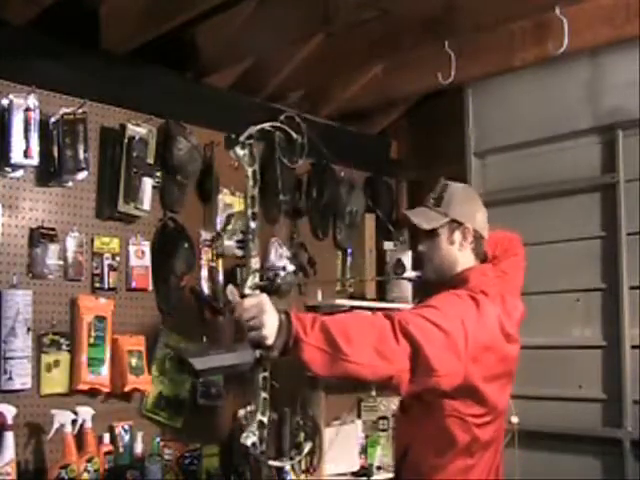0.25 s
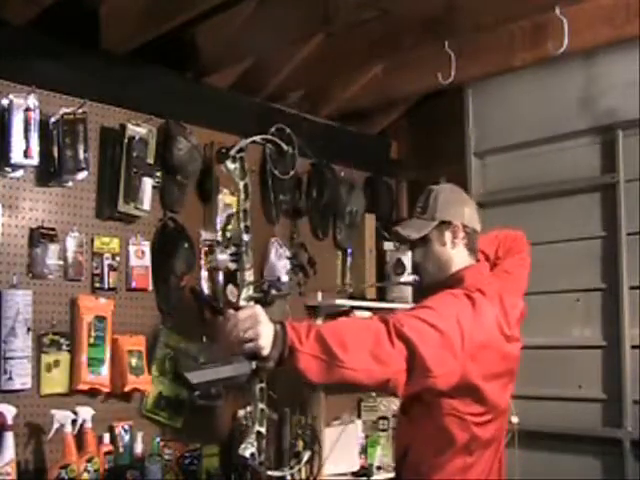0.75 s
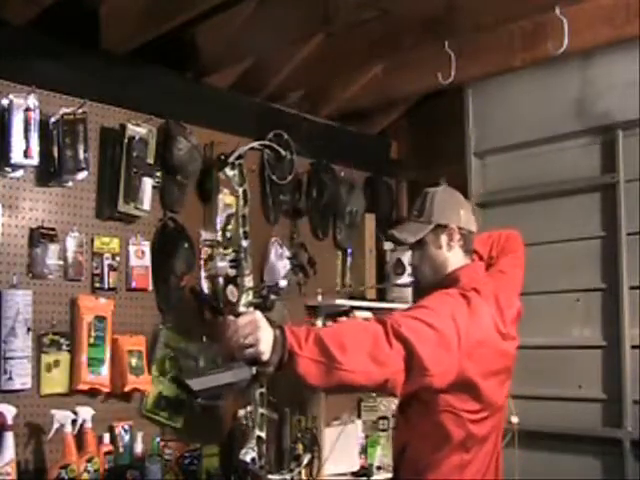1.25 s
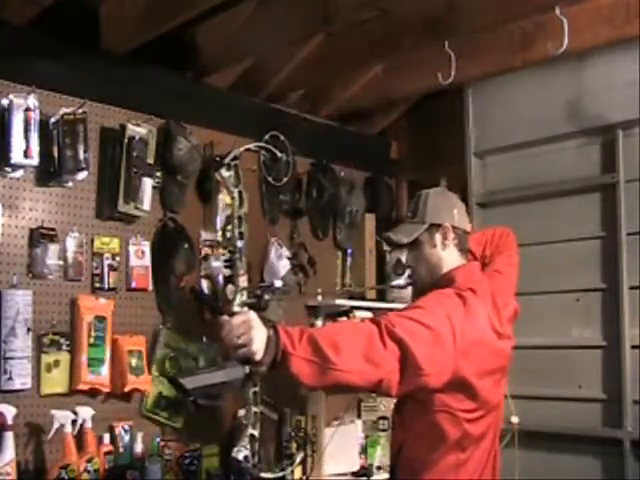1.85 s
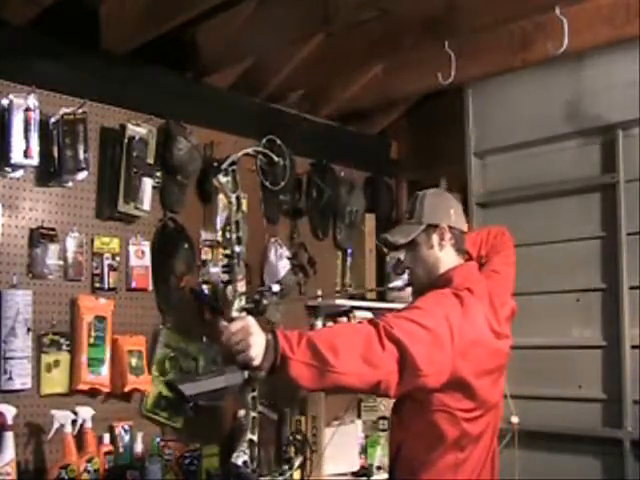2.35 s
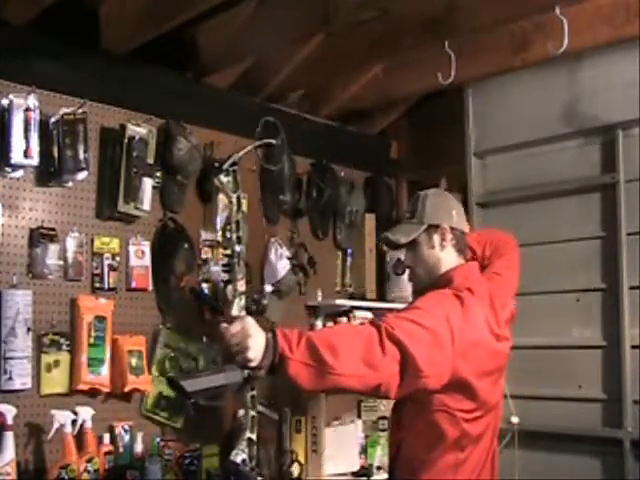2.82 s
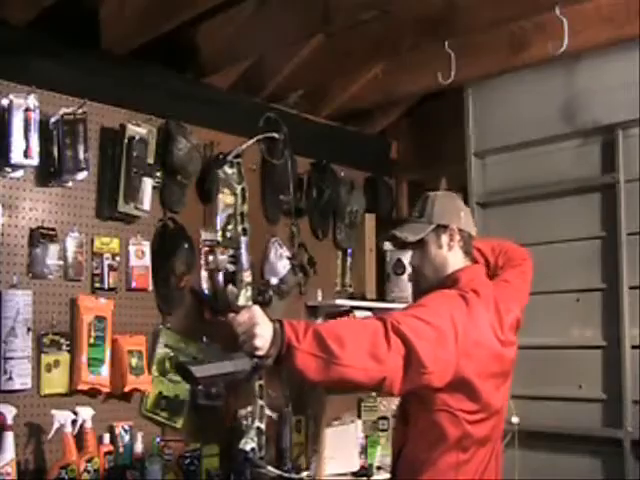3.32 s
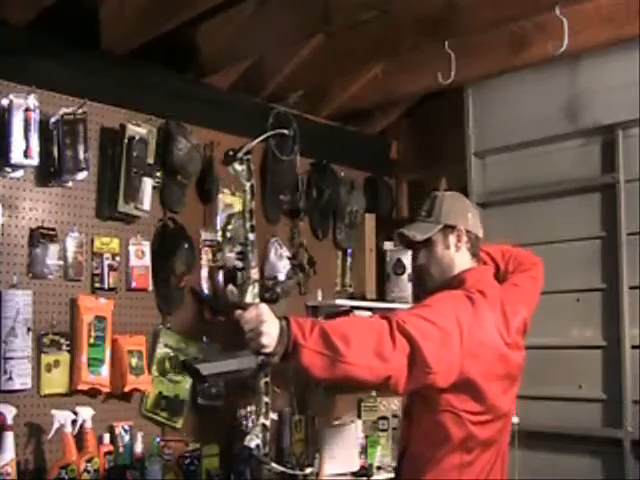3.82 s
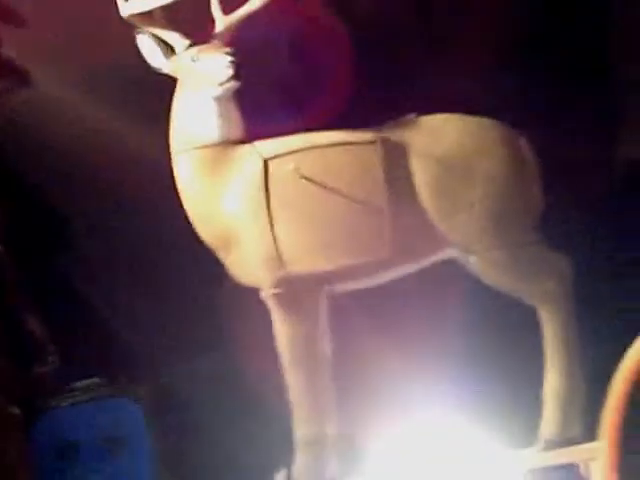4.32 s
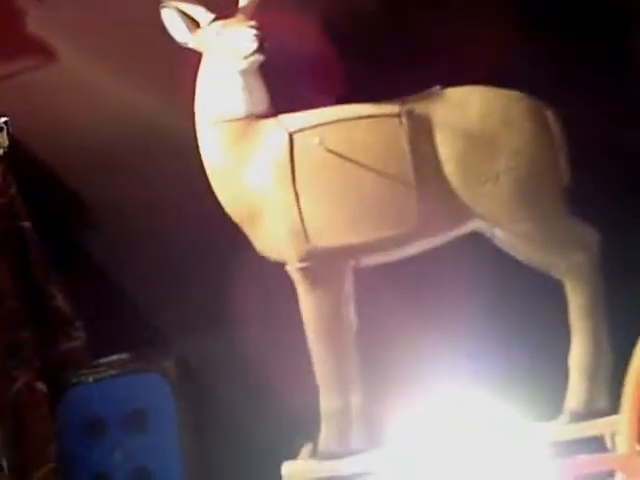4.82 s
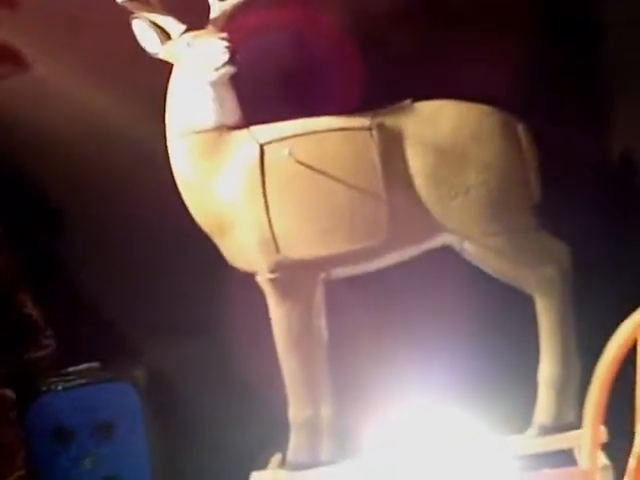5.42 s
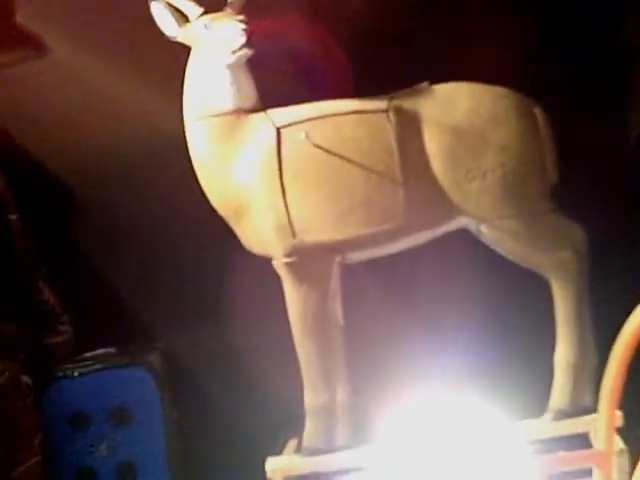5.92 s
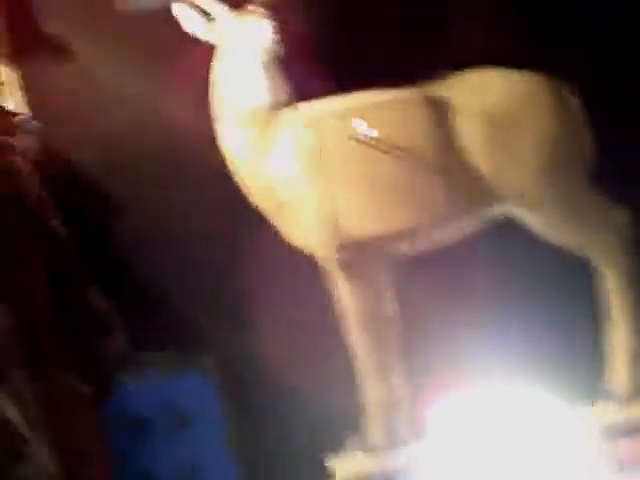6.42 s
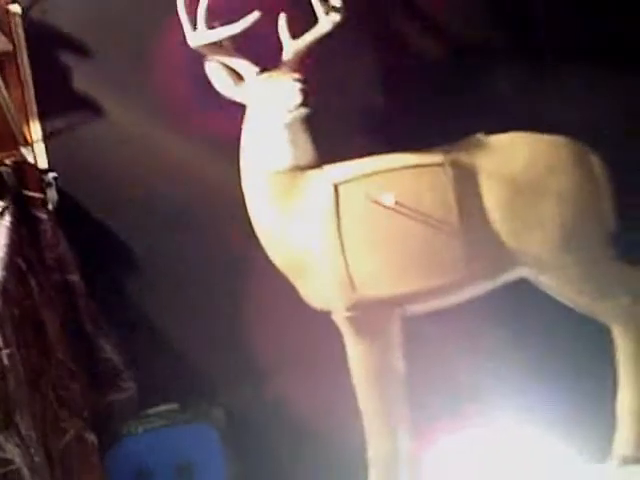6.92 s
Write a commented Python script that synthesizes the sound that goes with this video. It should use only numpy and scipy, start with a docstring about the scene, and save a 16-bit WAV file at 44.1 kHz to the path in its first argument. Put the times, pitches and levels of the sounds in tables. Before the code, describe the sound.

In a garage, a microphone worn by an archer picks up low electrical hum, muffled bumps and cloth rubs, mostly in the left channel. After a quiet aim, a compound bow releases with a clipped, violent snap, low ring and room tail. An abrupt cut leads to a centred camera near the foam target, with hiss and faint ticking, before the arrow smacks in hard with a short woody quiver.

```python
"""Lamp buzz and sleeve bumps in a garage, then a compound bow is shot at a foam deer target.
The microphone worn by the archer fills the left channel: knocks and rubs are short tones and filtered noise,
the release is snaps of noise, the bow decaying modes, the arrow a noise burst with the garage's diffuse tail.
After a cut, a mono camera beside the target ticks over a noise floor: the bow far off, then the arrow's smack.
Both are low-passed and clip at full scale."""
import sys
import numpy as np
from scipy import signal
from scipy.fft import rfft, irfft, next_fast_len
from scipy.io import wavfile
from scipy.ndimage import uniform_filter1d

SR = 44100
rng = np.random.default_rng(int(sys.argv[2]) if len(sys.argv) > 2 else 0)


def put_to_file(sound):
    """Save the sound as 16-bit audio at rate SR, in the file named by the first command-line argument."""
    columns = np.atleast_2d(sound).T  # one column per channel
    safe = np.clip(columns, -1, 1)
    whole_steps = np.round(safe * 32767)
    wavfile.write(sys.argv[1], SR, whole_steps.astype(np.int16))


N = 315756

# Buzz of the lamp ballasts at the archer. Each row: multiple of BUZZ_HZ, level in dB rms.
ARCHER_BUZZ = [(1, -38), (2, -44.5), (3, -51.5), (4, -51.5), (5, -60.5), (7, -49.5), (8, -53.5), (9, -54.5),
               (10, -54), (11, -57.5), (12, -51.5), (13, -47), (14, -54.5), (15, -62.5), (17, -60),
               (18, -77), (20, -70), (21, -77), (22, -62)]
# The same lamps beside the target. Each row: multiple of BUZZ_HZ, relative level in dB.
TARGET_BUZZ = [(3, -75.5), (4, -78), (7, -72), (8, -66), (9, -74.5), (11, -79), (12, -67.5), (13, -71),
               (14, -67), (15, -73.5), (16, -79.5), (17, -71.5), (18, -84), (20, -86), (21, -75.5)]
# Room air and hiss at the archer. Each row: frequency in Hz, relative level in dB.
ARCHER_AIR_COLOUR = [(20, -13.5), (36, -4), (52, 16.5), (80, -8.5), (130, -1), (190, -1.5), (255, 2),
                     (320, -7), (600, -13), (1000, -12), (1550, -20), (2000, -24), (3700, -28), (5600, -27),
                     (7500, -35.5), (12000, -34)]
# Room air and hiss beside the target. Each row: frequency in Hz, relative level in dB.
TARGET_AIR_COLOUR = [(20, -0.5), (100, 3.5), (270, 6), (600, -4), (1100, 0.5), (2000, -3.5), (3000, -4),
                     (3700, -12.5), (4500, -2), (5700, 0), (7200, -14.5), (11000, -18)]
# Cloth scuffs and brushes, and the arrow sliding over its rest.
# Each row: start in seconds, length in seconds, level in dB, centre frequency in Hz.
RUB_EVENTS = [(0.145, 0.39, -46, 4100), (0.298, 0.11, -21, 425), (0.337, 0.007, -28, 1300),
              (.376, 0.011, -18.5, 760), (0.37, 0.018, -27, 1540), (0.458, .12, -41, 2340),
              (2.362, 0.044, -32.5, 800), (2.36, .04, -44, 3500), (2.698, 0.085, -24.5, 1390),
              (2.701, 0.054, -41, 4970), (3.9, 0.34, -50.5, 3760)]
# Clothing and hand knock the worn microphone, and the bow's kick shakes it.
# Each row: start in seconds, level in dB, pitch in Hz.
BUMP_EVENTS = [(.238, -14, 72), (0.3235, -7, 200), (0.3443, -7.5, 310), (.355, -8.5, 51.4),
               (.364, -6.5, 227), (.3795, -4.5, 780), (0.423, -14.5, 135), (0.442, -12.5, 176),
               (.556, -13, 75), (2.359, -4, 260), (2.362, -6, 75), (2.368, -7, 37.8), (2.393, -9.5, 112),
               (2.424, -10.5, 45.5), (2.442, -11, 157), (2.6953, -6, 345), (2.712, -14, 85),
               (2.733, 0, 200), (2.739, -6, 55), (2.756, 2.5, 145), (2.823, 0, 116)]
# Scratch on top of each knock. Each row: frequency in Hz, relative level in dB.
SCRATCH_SPECTRUM = [(100, -1.5), (500, 3.5), (1500, -10), (3000, -22), (10000, -39)]
# Hard parts snap: release catch, cams, string stop, arrow shaft.
# Each row: start in seconds, level in dB, t60 in seconds.
SNAP_EVENTS = [(2.3588, -25.5, 0.0099), (2.7338, 2, 0.013), (2.7403, -6.5, 0.032), (2.758, -11, 0.076),
               (2.8326, -15, 0.02), (6.385, -27.5, 0.084), (6.4071, 1, 0.077), (6.4265, 1, 0.0092),
               (6.4449, -1, 0.016), (6.47, -13, 0.18)]
# Tone of every snap. Each row: frequency in Hz, relative level in dB.
SNAP_SPECTRUM = [(200, -12.5), (1000, 5.5), (2500, 0.5), (4000, 3.5), (6500, -5), (10000, -7.5),
                 (12000, -20.5)]
# The string shudders against its stop and drives the bow; the first two are close, the third far off.
# Each row: start in seconds, level in dB, pitch factor, swell in seconds, length in seconds.
STRING_JOLTS = [(2.7566, 11, 0.99, 0.00099, 0.026), (2.803, 5.5, 1.08, 0.0041, 0.025),
                (6.386, -12.5, .92, 0.0017, .03)]
# Riser and limbs. Each row: frequency in Hz before the jolt's pitch factor, relative level in dB, t60 in seconds.
RISER_MODES = [(328, -13.5, .25), (478, -2.5, 0.21), (836, -18.5, .2), (1990, -19, .2), (2640, -24, 0.11)]
# The note that lingers in the bow. Each row: frequency in Hz, level in dB, t60 in seconds.
LINGERING_MODES = [(501, -3.5, 0.26), (517, -1, 0.46)]
# The garage's answer at the archer. Each row: frequency in Hz, relative level in dB.
ARCHER_ECHO_COLOUR = [(47, -41.5), (80, -11.5), (202, -11), (264, -9), (318, -3), (470, -8.5), (511, -1.5),
                      (578, -7.5), (891, -14), (1050, -6), (1140, -10.5), (1370, -11.5), (2070, -28),
                      (4180, -28), (11000, -51), (14300, -84.5), (22000, -120)]
# The garage's answer beside the target. Each row: frequency in Hz, relative level in dB.
TARGET_ECHO_COLOUR = [(47, -54), (80, -24.5), (140, -8.5), (243, -11.5), (331, 1.5), (367, -13.5),
                      (399, -0.5), (451, -15), (532, -2), (566, -15), (988, -3.5), (2160, -18.5),
                      (4350, -19), (7750, -27), (11000, -35.5), (14300, -63), (22000, -120)]
# Decay of the garage. Each row: frequency in Hz, t60 in seconds before each tail's own factor.
GARAGE_DECAY = [(100, 0.47), (400, 0.39), (1200, 0.47), (4000, 0.5), (10000, 0.34)]
# The arrow drives into the foam, heard from the archer and then from beside the target. Each row: start in
# seconds, level in dB, swell in seconds, length in seconds, garage level in dB, factor on the garage's t60.
FOAM_HITS = [(2.82, -15, 0.0053, 0.049, 2, 0.89), (6.4047, 4, 0.0052, 0.023, -4, 0.95)]
# Tone of the arrow tearing in. Each row: frequency in Hz, relative level in dB.
HIT_SPECTRUM = [(40, -31.5), (90, -23.5), (150, 5), (280, 0.5), (650, -3.5), (1050, -2), (1650, 4),
                (2300, -12.5), (4000, -21.5), (8000, -21), (12000, -44)]
# Door panels and hanging tools near the archer.
# Each row: frequency in Hz, relative level in dB, t60 in seconds before an overall fade.
PANEL_MODES = [(604, -1, 0.64), (765, 0, 0.51), (857, -2, 0.7), (928, 3, 0.43), (1020, 7, 0.35),
               (1213, 4, 0.42), (1384, -11, 0.67), (1580, -14, 0.64), (1770, -5, 0.47)]
# Thin whine of the camera's electronics. Each row: frequency in Hz, relative level in dB.
CAMERA_WHINE = [(5222, -76.5), (9647, -86.5), (11025, -83)]
# Electrical ticking in the camera beside the target. Each entry: start in seconds.
TICK_TIMES = [4.269, 4.397, 4.502, 4.63, 4.756, 4.813, 4.937, 5.061, 5.127, 5.269, 5.36, 5.435, 5.566,
              5.696, 5.766, 5.867, 5.994, 6.099, 6.23, 6.633, 6.73, 6.831, 6.957, 7.047, 7.106]
# The shaft left quivering in the target. Each row: frequency in Hz, level in dB, t60 in seconds.
QUIVER_MODES = [(332, -14.5, 0.18), (409, -17, 0.61), (525, -21.5, 0.25), (1007, -12, 0.3),
                (1210, -20.5, 0.23), (1304, -13.5, 0.13), (1614, -9, .13), (1580, -10, 0.15),
                (1860, -10.5, 0.14)]
# The foam body thuds as the arrow comes to rest. Each row: frequency in Hz, level in dB, t60 in seconds.
FOAM_THUD_MODES = [(152.4, -16, 0.086), (205.6, -9.5, 0.13), (243, -3.5, 0.11)]

CUT_OUT_S, CUT_IN_S = 4.195, 4.222  # silence between the two places
BUZZ_HZ = 120  # lamp ballasts buzz at twice the mains rate
# Every knock dies within a few cycles (to fall by 60 dB); the higher its pitch, the more it scratches.
KNOCK_CYCLES, KNOCK_ATTACK_S = 6.6, 0.00041
SCRATCH_DB, SCRATCH_AT_HZ, SCRATCH_DB_PER_OCTAVE = -17, 121, 1  # against the knock
# Low scuffs are narrow, bright brushes wide: the width is RUB_WIDTH_HZ at RUB_AT_HZ.
RUB_WIDTH_HZ, RUB_AT_HZ, RUB_WIDENING, RUB_GRAIN_DB = 760, 1000, 1.5, 4
ARROW_STOP_S = 6.424
TICK_WIDTH_S, TICK_GAP_S = (0.00333, 0.00692), (0.00045, 0.0017)  # ranges: dip, gap to its follower
MIC_TOP_HZ, TOP_HZ = 11300, 15700  # low-pass corners before and after clipping
AGE = np.arange(SR) / SR  # seconds since an event began


def amp(db):
    """Decibels to gain."""
    return 10 ** (np.asarray(db) / 20)


def unit(x):
    """Scale to rms 1."""
    return x / np.sqrt(np.mean(x ** 2))


def fade(t60):
    """Exponential decay, 60 dB down after t60 seconds."""
    return np.exp(-np.log(1000) * AGE / t60)


def swell(seconds):
    """Soft onset with this time constant."""
    return 1 - np.exp(-AGE / seconds)


def add(track, s, sound):
    """Mix a sound into the track from s seconds on."""
    start = int(s * SR)
    track[start:start + len(sound)] += sound[:N - start]


def lookup(hz, points):
    """Read (Hz, value) points on a log-frequency axis."""
    f, value = np.transpose(points)
    return np.interp(np.log(hz + 1), np.log(f), value)


def noise(points, size=SR):
    """Noise of rms 1 with a (Hz, dB) spectrum."""
    bins = rfft(rng.standard_normal(next_fast_len(size)))
    hz = np.linspace(0, SR / 2, len(bins))
    return unit(irfft(bins * amp(lookup(hz, points)))[:size])


def wander(t, step_s):
    """Random values every step_s seconds, joined by straight lines."""
    knots = np.arange(0, t[-1] + 1, step_s)
    return np.interp(t, knots, rng.standard_normal(len(knots)))


def hum(lines, waver):
    """Steady tones, each wavering a little in strength and phase."""
    t = np.arange(N) / SR
    out = np.zeros(N)
    for hz, db in lines:
        strength = 1 + waver * wander(t, 0.17)
        phase = 2 * np.pi * rng.random() + waver * wander(t, 0.17)
        out += np.sqrt(2) * amp(db) * strength * np.sin(2 * np.pi * hz * t + phase)
    return out


def buzz(partials, waver):
    """Lamp ballasts: harmonics of twice the mains rate."""
    return hum([(multiple * BUZZ_HZ, db) for multiple, db in partials], waver)


def air(points, drift_db):
    """Background noise whose low, middle and high parts drift in level on their own."""
    t = np.arange(N) / SR
    bins = rfft(noise(points, size=N))
    # 0 at 100 Hz, 1 at 1 kHz, 2 at 10 kHz
    place = np.clip(np.log10(np.linspace(0, SR / 2, len(bins)) + 1) - 2, 0, 2)
    out = np.zeros(N)
    for k in range(3):
        part = irfft(bins * np.maximum(1 - abs(place - k), 0), N)
        out += amp(drift_db * wander(t, 0.2)) * part
    return out


def idle_input():
    """Faint hiss of the unused right input while the archer's microphone is on the left."""
    return amp(-53) * noise([(20, 10.5), (200, 6.5), (1000, 3), (11000, 4)], size=N)


def band(x, hz, width):
    """One broad resonance."""
    return signal.lfilter(*signal.iirpeak(hz, hz / width, fs=SR), x)


def rubbing():
    """Cloth or shaft sliding: grainy noise through a resonance, each rub swelling and sinking once."""
    out = np.zeros(N)
    for s, length, db, hz in RUB_EVENTS:
        width = RUB_WIDTH_HZ * (hz / RUB_AT_HZ) ** RUB_WIDENING
        grain = unit(uniform_filter1d(rng.standard_normal(SR), size=100))
        fibres = rng.standard_normal(SR) * amp(RUB_GRAIN_DB * grain)
        stroke = np.sin(np.pi * np.minimum(AGE / length, 1))
        add(out, s, amp(db) * stroke * unit(band(band(fibres, hz, width), hz, width)))
    return out


def bumps():
    """Knocks on the worn microphone: a dull, quickly damped tone with a little scratch on top."""
    out = np.zeros(N)
    for s, db, hz in BUMP_EVENTS:
        thud = swell(KNOCK_ATTACK_S) * np.sin(2 * np.pi * hz * AGE)
        scratch_db = SCRATCH_DB + SCRATCH_DB_PER_OCTAVE * np.log2(hz / SCRATCH_AT_HZ)
        scratch = amp(scratch_db) * swell(0.0015) * noise(SCRATCH_SPECTRUM)
        add(out, s, amp(db) * fade(KNOCK_CYCLES / hz) * (thud + scratch))
    return out


def snaps():
    """Hard parts of bow and arrow snap: bright noise that dies at once."""
    out = np.zeros(N)
    for s, db, t60 in SNAP_EVENTS:
        add(out, s, amp(db) * fade(t60) * noise(SNAP_SPECTRUM))
    return out


def ring(modes, pitch=1):
    """Decaying modes after one blow."""
    return sum(amp(db) * fade(t60) * np.sin(2 * np.pi * hz * pitch * AGE) for hz, db, t60 in modes)


def garage(colour, build_s, lasting):
    """Diffuse tail of the room: it builds up, then each octave dies at its own rate."""
    bins = rfft(noise(colour))
    octave = np.clip(np.log2((np.arange(len(bins)) + 1) / 80), 0, 7)  # octaves above 80 Hz
    tail = np.zeros(SR)
    for k in range(8):
        part = irfft(bins * np.maximum(1 - abs(octave - k), 0))
        tail += part * fade(lasting * lookup(80 * 2 ** k, GARAGE_DECAY))
    return swell(build_s) * tail


def bow():
    """The low ring of riser and limbs each time the string jolts them."""
    out = np.zeros(N)
    for s, db, pitch, swell_s, length in STRING_JOLTS:
        drive = swell(swell_s) / (1 + (AGE / length) ** 12)
        add(out, s, amp(db) * drive * ring(RISER_MODES, pitch))
    # close to the archer the bow is heard ringing on, and its first jolt fills the garage
    add(out, STRING_JOLTS[1][0], swell(0.02) * ring(LINGERING_MODES))
    add(out, STRING_JOLTS[0][0], amp(-0.5) * garage(ARCHER_ECHO_COLOUR, build_s=0.0022, lasting=0.94))
    return out


def arrow():
    """The point tears into the foam until it stops; the garage answers and the shaft quivers."""
    out = np.zeros(N)
    for hit, echo in zip(FOAM_HITS, (ARCHER_ECHO_COLOUR, TARGET_ECHO_COLOUR)):
        s, db, swell_s, length, garage_db, lasting = hit
        braking = swell(swell_s) / (1 + (AGE / length) ** 7)
        add(out, s, amp(db) * braking * noise(HIT_SPECTRUM))
        add(out, s, amp(garage_db) * garage(echo, build_s=0.018, lasting=lasting))
    # panels and tools ring near the archer; shaft and foam are heard only from beside the target
    add(out, FOAM_HITS[0][0], amp(-11.5) * swell(0.0057) * fade(2.4) * ring(PANEL_MODES))
    add(out, FOAM_HITS[1][0], swell(0.0038) * ring(QUIVER_MODES))
    add(out, ARROW_STOP_S, swell(0.003) * ring(FOAM_THUD_MODES))
    return out


def suppress(x, quiet_db, loud_db, depth_db):
    """Noise suppressor: the gain sinks as the sound fades towards the background."""
    power = np.maximum(uniform_filter1d(x ** 2, size=900), 0)  # averaged over about 20 ms
    level_db = 10 * np.log10(power + 1e-12)
    return x * amp(np.interp(level_db, [quiet_db, loud_db], [depth_db, 0]))


def ticking():
    """Short rectangular dips, each with a shorter one close behind, rounded by the amplifier."""
    dips = np.zeros(N)
    for s in TICK_TIMES:
        width, gap = rng.uniform(*TICK_WIDTH_S), rng.uniform(*TICK_GAP_S)
        add(dips, s, -1.0 * (AGE < width))
        add(dips, s + width + gap, -0.6 * (AGE < 0.0009))
    coupled = signal.sosfilt(signal.butter(1, 36, "highpass", fs=SR, output="sos"), dips)
    return amp(-37.5) * signal.sosfilt(signal.butter(2, 720, fs=SR, output="sos"), coupled)


def scene():
    """The archer's microphone on the left until the cut, then the target camera on both sides."""
    t = np.arange(N) / SR
    shots = snaps() + bow() + arrow()
    archer_floor = buzz(ARCHER_BUZZ, waver=0.24) + amp(-31.5) * air(ARCHER_AIR_COLOUR, drift_db=0.6)
    at_archer = archer_floor + rubbing() + bumps() + shots

    target_floor = amp(7.5) * buzz(TARGET_BUZZ, waver=0.12)
    target_floor += amp(9.5) * hum(CAMERA_WHINE, waver=0.1)
    target_floor += amp(-50.5) * air(TARGET_AIR_COLOUR, drift_db=0.7)
    at_target = suppress(shots + target_floor, quiet_db=-45.0, loud_db=-25.5, depth_db=-7.0)
    at_target += ticking()  # joins after the suppressor
    return np.array([at_archer, idle_input()]) * (t < CUT_OUT_S) + at_target * (t > CUT_IN_S)


def record(dry):
    """Narrow-band sound, clipped flat at full scale; the edges of the clipping are slightly rounded."""
    narrow = signal.sosfilt(signal.ellip(8, 0.2, 70, MIC_TOP_HZ, fs=SR, output="sos"), dry)
    clipped = np.clip(narrow, -1, 1)
    rounded = signal.sosfilt(signal.butter(2, 13500, fs=SR, output="sos"), clipped)
    return signal.sosfilt(signal.ellip(8, 0.2, 70, TOP_HZ, fs=SR, output="sos"), rounded)


dry = scene()
out = record(dry)
put_to_file(out)
```